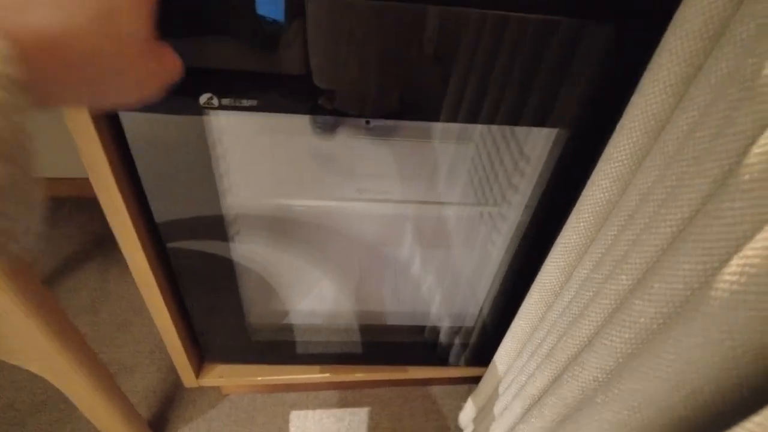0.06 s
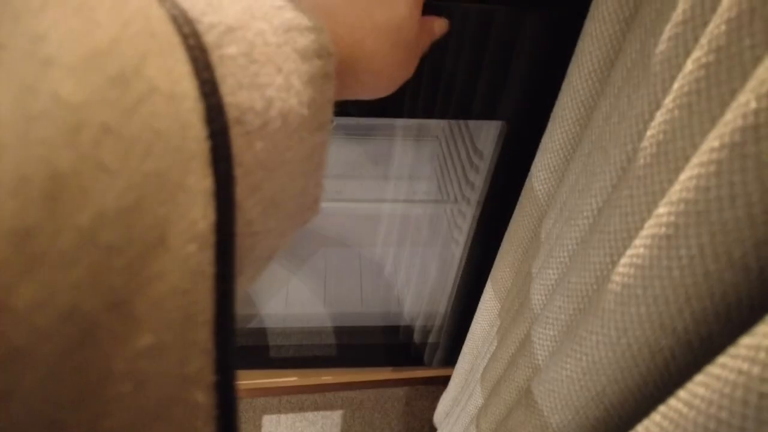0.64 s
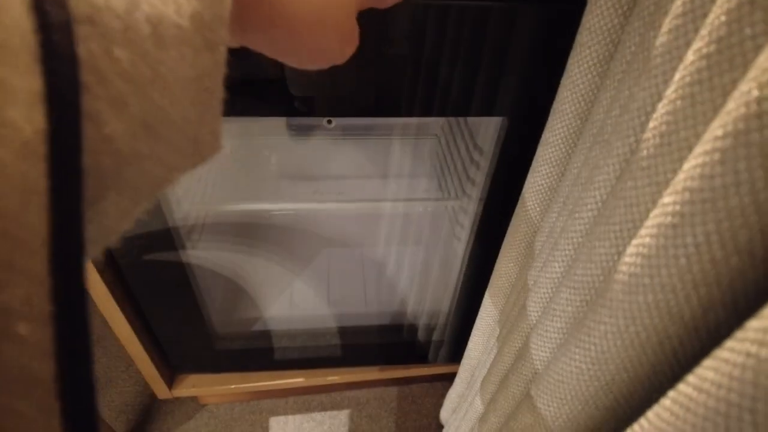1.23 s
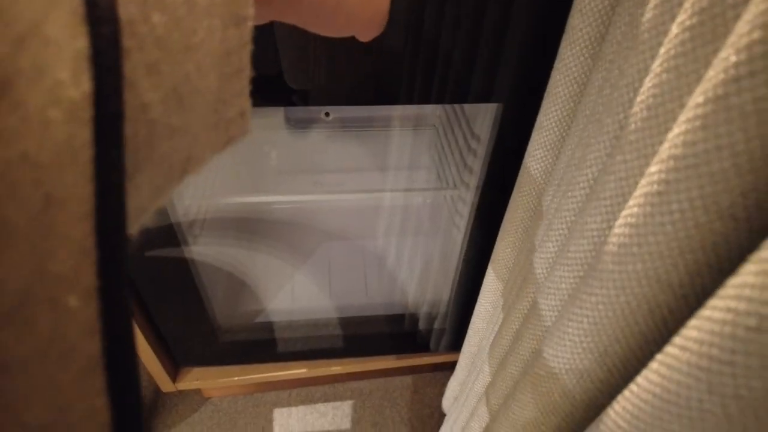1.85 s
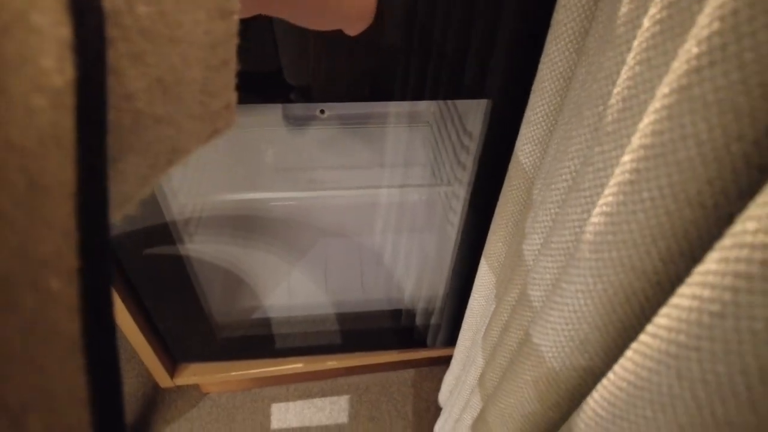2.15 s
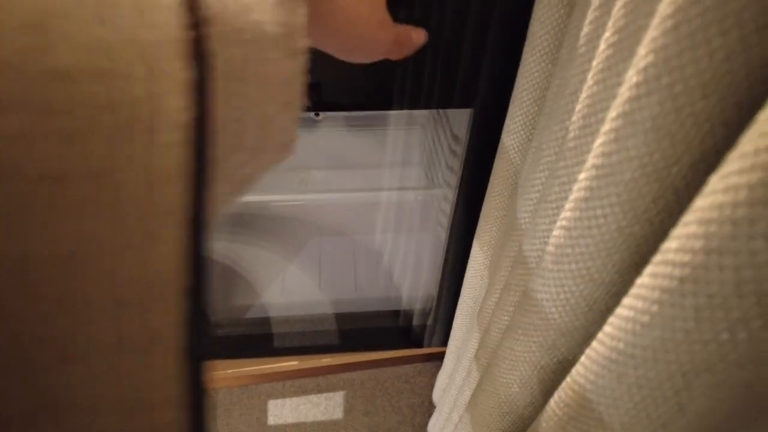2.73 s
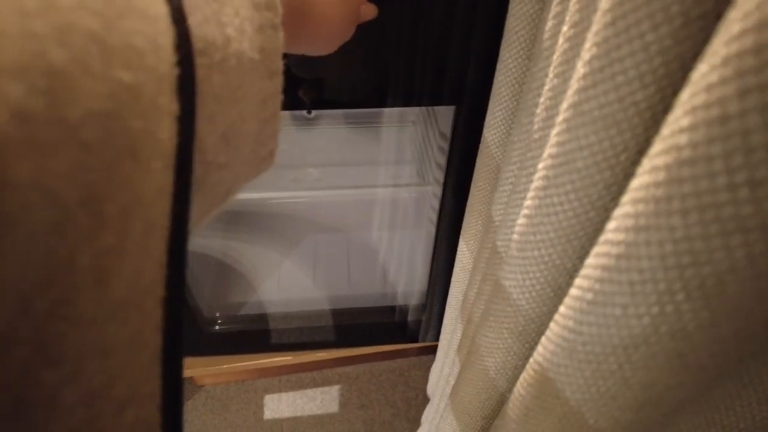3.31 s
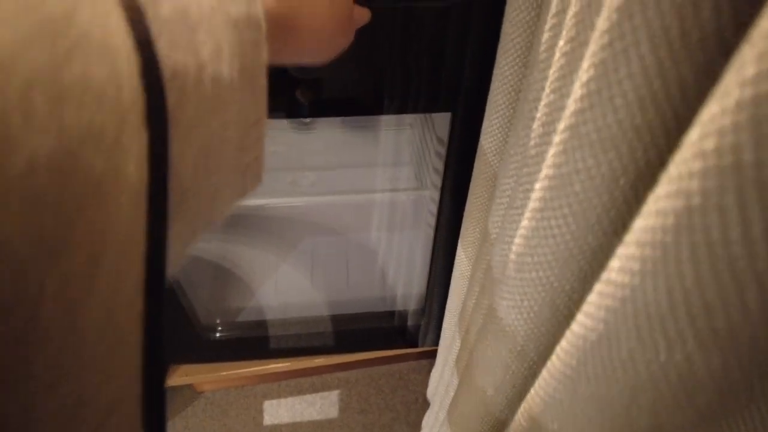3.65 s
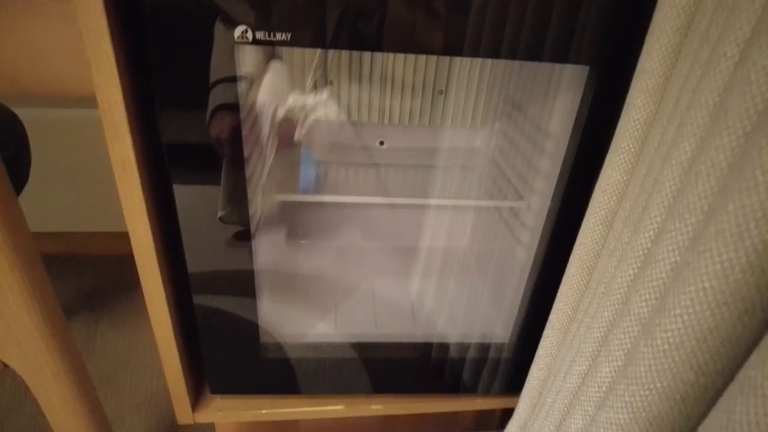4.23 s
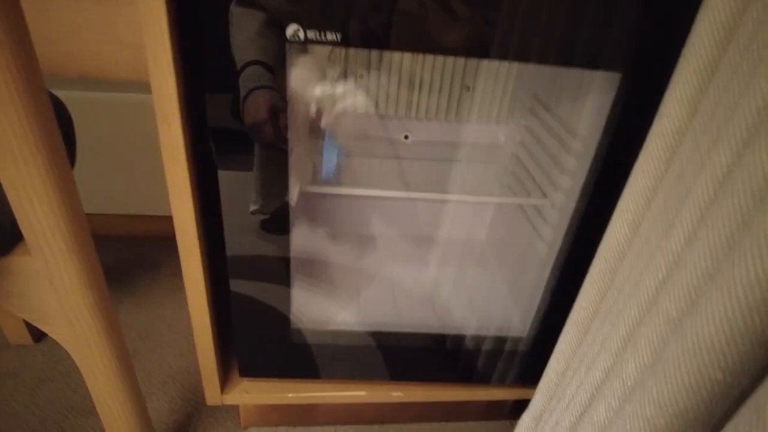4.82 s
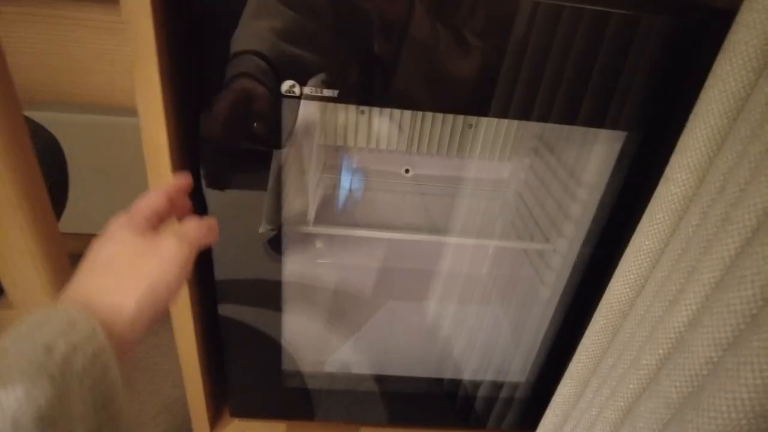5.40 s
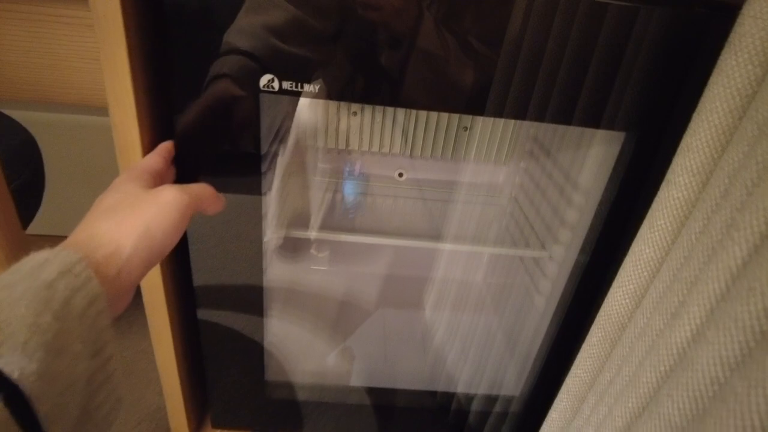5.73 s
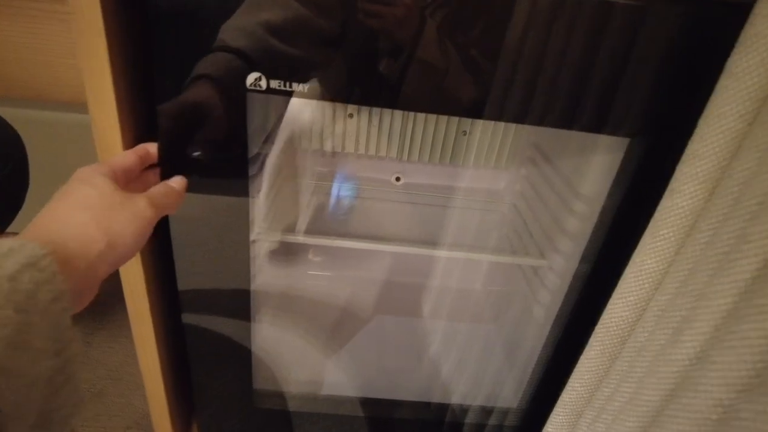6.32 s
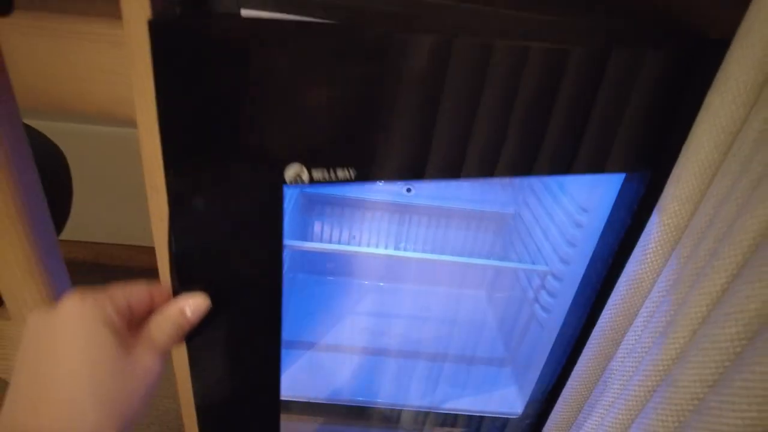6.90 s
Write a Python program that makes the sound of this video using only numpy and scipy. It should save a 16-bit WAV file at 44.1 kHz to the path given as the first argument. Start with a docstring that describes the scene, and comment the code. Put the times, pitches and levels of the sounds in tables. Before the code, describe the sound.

Fingers click and knock on a small fridge's glass door, then its rubber seal peels open, over a deep hum.

```python
"""A hand works the glass door of a small fridge, an arm's length away in a quiet carpeted room.
Fingers try the wrong edge: the plastic frame clicks, a sleeve brushes it and the cabinet thumps.
Then the hand taps the other edge, the rubber seal crackles loose and the door opens with a soft bump.
Each touch is a short push that makes the door or cabinet ring. Behind it all are the fridge's deep
electrical hum, a low rumble of ventilation, a faint hiss and tiny high pips."""
import sys
import numpy as np
from scipy import signal
from scipy.fft import rfft, irfft
from scipy.io import wavfile
from scipy.ndimage import uniform_filter1d

SR = 44100
rng = np.random.default_rng(int(sys.argv[2]) if len(sys.argv) > 2 else 0)


def store_wav(level_fs):
    """Save 16-bit WAV to argv[1]."""
    pcm = np.round(np.clip(np.atleast_2d(level_fs), -1, 1) * 32767)
    wavfile.write(sys.argv[1], SR, pcm.T.astype(np.int16))


N = 306936

# Levels are starting values that the functions shape further. A ring time (t60) is the time to fade
# by 60 dB. "Mid" is the sound both ears share; "side" is what differs between them.

# Clicks of fingers, frame and seal. A hard touch adds treble, a heavy one bass; two notes ring on.
# (time [s], level [dB], treble [dB/octave], bass [dB/octave],
#  first note [Hz], its level [dB], second note [Hz], its level [dB])
DOOR_CLICKS = [(1.5695, -62.5, -7, 0.5, 987, -66, 1920, -70),
               (1.6806, -52.5, 3.5, -0.5, 1016, -58, 3320, -76),
               (1.8193, -39, 2, -1, 582, -42, 1387, -36.5), (1.8239, -48.5, -1, -1.5, 1636, -40, 3210, -48),
               (1.844, -46, -3, -17, 610, -70, 6400, -63), (1.8974, -51, -2, -2, 886, -61, 1960, -58),
               (1.908, -49.5, -4, 2.5, 587, -72, 1040, -58),
               (2.0062, -33, -0.5, -0.5, 1500, -42.5, 4750, -38),
               (2.014, -49, -9, 1.5, 980, -42.5, 1890, -42),
               (2.042, -36.5, -9.5, -0.5, 1080, -38.5, 2880, -43),
               (2.156, -48.5, -1, -0.5, 510, -51.5, 1770, -53),
               (2.1893, -50, -0.5, -14, 380, -65, 2060, -59), (2.2282, -54, -1, 3, 950, -52, 360, -49),
               (2.2406, -53, -3, 0.5, 944, -54, 6200, -67), (2.338, -66, -10, 6.5, 598, -57, 844, -56),
               (2.678, -61, -4, 0.5, 660, -62, 4350, -64), (2.766, -62.5, 4, 2.5, 670, -53, 6080, -62),
               (2.98, -51.5, -4, -0.5, 900, -67, 1898, -53), (3.0877, -46, -5.5, 6, 586, -38, 1594, -53.5),
               (3.092, -58, 2, -12, 1225, -48, 4400, -63.5), (3.159, -61, -8, 0, 1930, -59, 6100, -66.5),
               (3.8241, -67.5, 5, 6.5, 614, -68, 5974, -63),
               (6.0365, -59.5, 5.5, -2.5, 2620, -64, 6200, -62),
               (6.1121, -45, 2.5, -1, 1014, -47.5, 1940, -46), (6.1164, -53, -2, 2, 856, -47.5, 2330, -53),
               (6.1476, -53, 4.5, -19, 801, -57, 5900, -49), (6.2389, -51, -5.5, 3, 461, -52, 2130, -61),
               (6.323, -62.5, 5, 2.5, 774, -70, 3000, -72), (6.364, -67, -6, -7, 1650, -59, 2520, -69),
               (6.3843, -58.5, 8.5, 2.5, 940, -51, 6370, -53), (6.4074, -44, 4, 4, 738, -51, 2800, -60),
               (6.413, -45, -7, -2.5, 1570, -49, 5640, -50), (6.4746, -50.5, 5, 1.5, 704, -56, 4160, -50),
               (6.528, -54.5, 3, -3.5, 1610, -53, 4230, -57), (6.605, -59.5, 2.5, -8, 473, -73, 1580, -70)]
# The door's five pitch ranges: frame, body, pane, edge and tick.
# (low end [Hz], high end [Hz], ring time [s], gain [dB], side level [dB], room ring time [s])
DOOR_RANGES = [(1034, 2310, 0.044, -8, -21, 0.37), (224.5, 582, 0.076, 0, -12.5, 0.84),
               (544, 1100, 0.14, -7.5, 1, 0.42), (2200, 5900, 0.053, -13, -2.5, 0.25),
               (5770, 19000, 0.044, -24, -8, 0.43)]
# Pitches at which the door likes to ring: (pitch [Hz], width [Hz], gain [dB])
DOOR_RESONANCES = [(250.7, 29, 23), (296, 38, 18.5), (402, 56, 12.5), (445, 26, 4.5), (602, 10, 13.5),
                   (730, 76, 10), (867, 40, 12), (983, 50, 9.5), (1225, 26, 11.5), (1322, 160, 12),
                   (1475, 81, 8), (1670, 74, 5), (1786, 240, 3), (2370, 47, 5), (2710, 260, 5.5),
                   (2970, 28, 10), (3250, 240, 3.5), (4030, 420, -2.5), (4580, 62, -2), (5150, 20, -18),
                   (7650, 83, 3)]
# Blows that shake the cabinet:
# (time [s], level [dB], contact time [s], pitch below which the cabinet hardly moves [Hz])
CABINET_BLOWS = [(0.201, -30.5, 0.024, 29.4), (1.82, -24, 0.0034, 330), (1.909, -33.5, 0.0032, 250),
                 (2.006, -34.5, 0.0031, 170), (2.04, -38.5, 0.0041, 90), (3.0854, -21, 0.0045, 79.6),
                 (3.117, -26.5, 0.0073, 60.4), (3.211, -40.5, 0.0062, 81), (4.289, -25, 0.023, 108),
                 (4.37, -29.5, 0.02, 110), (6.113, -35, 0.00099, 334), (6.4087, -26.5, 0.0025, 230),
                 (6.416, -29.5, 0.013, 60)]
# The cabinet's own notes: (pitch [Hz], level [dB], ring time [s])
CABINET_NOTES = [(44.6, 2.5, 1), (86.1, 5, 0.26), (118.1, -3, 0.45), (167.7, -8, 0.41), (191, -5, 0.14),
                 (255.7, 0.5, 0.12), (282.4, 2.5, 0.11), (324, -2, 0.045), (396.5, -14, 0.2),
                 (446.4, -14.5, 0.22)]
# Hollow tones of the gap as the door opens: (pitch [Hz], width [Hz], level [dB])
GAP_RESONANCES = [(335, 55, -58), (450, 40, -55.5), (536, 90, -63), (725, 72, -63), (883, 110, -63),
                  (1300, 440, -69)]
# The flat hand lands on the door's edge, then the fingers settle: (time [s], level [dB])
HAND_PATS = [(5.5162, -44), (5.523, -47), (5.547, -54), (5.5815, -56.5)]
# Pitches at which that edge rings: (pitch [Hz], width [Hz], gain [dB])
EDGE_RESONANCES = [(467, 40, 23.5), (814, 130, 11.5), (1230, 89, 13), (1530, 200, 10), (1790, 160, -1)]
# Dry ticks of a fingernail, a cuff or the seal:
# (time [s], level [dB], low end [Hz], high end [Hz], ring time [s])
SHARP_TICKS = [(1.8435, -69, 4500, 8000, .008), (2.0072, -55, 11500, 14800, .03),
               (2.0402, -58, 11000, 14500, .04), (2.23, -63, 3500, 10000, .008),
               (2.2403, -64, 5000, 8450, .008), (2.679, -65, 3500, 6500, 0.027),
               (3.78, -68, 1800, 6500, .012), (3.8123, -60.5, 1700, 4200, 0.012),
               (3.8238, -65, 3000, 8000, 0.011), (4.2255, -58.5, 550, 3260, 0.00064),
               (6.147, -59, 5500, 10500, .012), (6.4666, -59, 5000, 8000, .012),
               (6.4743, -54.5, 4000, 10000, 0.0061)]
# Sleeve and fingers slide on the door:
# (time [s], rise [s], fade [s], level [dB], treble [dB/octave], bass [dB/octave])
DOOR_RUBS = [(2.15, 0.009, 0.23, -59, -2.5, 1.5), (2.44, 0.071, 0.11, -74, -8, 2.5),
             (2.7, 0.071, 0.017, -80, 8.5, 10.5), (3.029, 0.076, 0.025, -58.5, -1.5, 2.5),
             (6.057, 0.049, 0.046, -60.5, 3, 3), (6.23, 0.045, 0.67, -64.5, -1.5, 2.5)]
# The sleeve drags over the cabinet as the arm comes and goes:
# (time [s], rise [s], hold [s], fade [s], level [dB], treble [dB/octave])
SLEEVE_BRUSHES = [(0.323, 0.0078, 0.038, 0.029, -60.5, 2.5), (0.397, .035, 0.029, 0.037, -70, -10),
                  (3.938, 0.017, 0.043, 0.041, -63.5, 2)]
# Pitches that stand out in that drag: (pitch [Hz], width [Hz], gain [dB])
FABRIC_RESONANCES = [(250.5, 52, 7.5), (476, 98, 4), (702, 107, -2), (1240, 300, -11), (2740, 2200, -21),
                     (5000, 4700, -17.5), (11100, 17000, -22)]
# The hum as the listener moves through loud and quiet spots of the room: (time [s], level [dB])
HUM_LEVELS = [(0, -43), (.2, -41.5), (.45, -48), (.75, -67), (1.05, -57), (1.5, -50.5), (2, -40),
              (2.4, -37), (2.85, -48.5), (3.35, -45.5), (3.65, -41), (4, -41.5), (4.15, -49), (4.3, -39),
              (4.55, -54), (5.75, -51), (6.05, -41.5), (6.45, -39.5), (6.75, -45.5), (6.96, -40)]
# Low rumble of the room and the moving hand: (time [s], level [dB])
RUMBLE_LEVELS = [(0, -46.5), (.45, -46.5), (.9, -48), (2.1, -46), (3.7, -45.5), (4.35, -46.5), (5, -47.5),
                 (6.2, -46), (6.96, -48.5)]
# Tone colour of the rumble: (pitch [Hz], relative level [dB])
RUMBLE_COLOUR = [(20, -4), (30, -1), (40, 1), (55, -2.5), (80, 4), (105, -6.5), (135, -4.5), (190, -9.5),
                 (250, -13), (310, -25.5), (450, -33), (800, -69)]
# Tone colour of the hiss: (pitch [Hz], relative level [dB])
HISS_COLOUR = [(200, 13.5), (500, 18), (750, 15), (1000, 10), (1400, 13), (2200, 4.5), (3000, 5.5),
               (3700, 1.5), (4500, 2), (7000, -3), (8800, -4.5), (9600, -5), (12400, -6.5), (13200, -39)]
# Brief dips in the middle range of the hiss: (time [s], hold [s])
HISS_DIPS = [(0.731, 0.243), (5.202, 0.069)]
# How much the room noise differs between the ears: (pitch [Hz], side minus mid [dB])
STEREO_WIDTH = [(25, -34), (60, -22.5), (250, -13.5), (500, -0.5), (1200, 1), (3000, -1), (8000, 0.5)]

PIVOT_HZ = 1600  # treble and bass are counted in octaves from here
TIME = np.arange(N) / SR


def door_clicks(snap=6.5, build_s=0.0022, room_db=-20.5, blow_s=0.0071, firm_db=-36, doubling_db=54):
    """A click is a snap, a rattle of echoes building up in the wooden recess, and a short room tail."""
    out, t = np.zeros((2, N)), TIME[:SR // 3]
    for at, db, treble_db, bass_db, *_ in DOOR_CLICKS:
        stretch = 2 ** ((db - firm_db) / doubling_db)  # a firmer click shakes more door and rings longer
        for low_hz, high_hz, t60, gain_db, side_db, room_t60 in DOOR_RANGES:
            build_up = 1 - np.exp(-t / (build_s * stretch))
            rattle = stereo_noise(len(t), side_db) * build_up * fade(t, t60 * stretch)
            rattle[:, 0] = snap
            # each pitch range has a room tail of its own length
            tail = stereo_noise(len(t), side_db / 2) * undb(room_db) * fade(t, room_t60)
            click = door_ring(rattle + min(stretch, 1) * tail, low_hz, high_hz)
            level_db = db + gain_db + touch_db(low_hz, high_hz, treble_db, bass_db)
            add(out, as_blow(click, blow_s) * undb(level_db), at)
    return out


def door_ring(force, low_hz, high_hz):
    """The door answers a push by ringing; this gives one pitch range of that answer."""
    nearby = [row for row in DOOR_RESONANCES if low_hz / 2 < row[0] < high_hz * 2]
    return band(resonate(force, nearby), low_hz, high_hz, order=3)


def touch_db(low_hz, high_hz, treble_db, bass_db):
    """How many dB a hard or heavy touch adds to one pitch range of the door."""
    octaves = np.log2(np.sqrt(low_hz * high_hz) / PIVOT_HZ)
    return abs(octaves) * (treble_db if octaves > 0 else bass_db)


def door_notes(pivot_t60=0.046, shortening=0.71, build_s=0.0012, side_db=-10):
    """Each spot on the door has two notes that ring on after a click; higher notes die sooner."""
    out, t = np.zeros((2, N)), TIME[:SR // 4]
    for at, *_, first_hz, first_db, second_hz, second_db in DOOR_CLICKS:
        for hz, db in (first_hz, first_db), (second_hz, second_db):
            mid, side = np.sin(2 * np.pi * (hz * t + rng.random((2, 1))))
            t60 = pivot_t60 * (PIVOT_HZ / hz) ** shortening
            envelope = (1 - np.exp(-t / build_s)) * fade(t, t60)
            add(out, undb(db) * envelope * stereo(mid, undb(side_db) * side), at)
    return out


def cabinet_thumps(spread_s=0.0023):
    """A blow rings the cabinet: a slow push leaves its deep notes, a light knock its higher ones."""
    out, t = np.zeros(N), TIME[:SR]
    for at, db, contact_s, low_hz in CABINET_BLOWS:
        lags = spread_s * rng.random(len(CABINET_NOTES))  # each wall's sound takes its own path
        ring = np.zeros(len(t))
        for k, ((hz, note_db, t60), lag) in enumerate(zip(CABINET_NOTES, lags)):
            gain = undb(note_db) * hz ** 2 / (hz ** 2 + low_hz ** 2)
            wave = np.sin(2 * np.pi * hz * np.maximum(t - lag, 0))
            ring += (-1) ** k * gain * fade(t, t60) * wave  # neighbouring notes swing opposite ways
        push = t * np.exp(-2 * np.pi * t / contact_s)
        thump = signal.fftconvolve(ring, push / push.sum())[:len(t)]
        add(out, undb(db) * thump, at)
    return out


def seal_peel(snaps_per_s=6500, scatter_db=2.5, side_db=-5, rasp_db=-63.5):
    """The rubber seal peels off the cabinet: tiny snaps merge into a rasp and ring the opening gap."""
    lets_go = rng.random((2, N)) < snaps_per_s / SR
    snaps = lets_go * rng.standard_normal((2, N)) * undb(scatter_db * wobble(500))
    force = stereo(snaps[0], undb(side_db) * snaps[1])
    rasp = unit(door_ring(force, low_hz=796, high_hz=7200)) * undb(rasp_db)
    hollow = sum(undb(db) * unit(band(force, hz - width_hz / 2, hz + width_hz / 2, order=2))
                 for hz, width_hz, db in GAP_RESONANCES)
    return (rasp + hollow) * stroke(at=6.405, rise_s=0.022, hold_s=0.084, fade_s=0.026)


def hand_pats(push=7.8, t60=0.046, side_db=-7, room_db=-19, room_t60=0.47, blow_s=0.0056):
    """Soft skin takes the treble out of a tap on the door's edge; a gentle room tail follows."""
    out, t = np.zeros((2, N)), TIME[:SR // 3]
    envelope = fade(t, t60) + undb(room_db) * fade(t, room_t60)
    for at, db in HAND_PATS:
        force = stereo_noise(len(t), side_db) * envelope
        force[:, 0] = push
        tap = band(resonate(force, EDGE_RESONANCES), low_hz=290, high_hz=2280, order=3)
        add(out, as_blow(tap, blow_s) * undb(db), at)
    return out


def sharp_ticks(snap=11.0, side_db=-4, blow_s=0.0014):
    """A dry snap with a very short rattle, heard alone or as the bright edge of a door click."""
    out, t = np.zeros((2, N)), TIME[:SR // 20]
    for at, db, low_hz, high_hz, t60 in SHARP_TICKS:
        force = stereo_noise(len(t), side_db) * fade(t, t60)
        force[:, 0] = snap
        tick = band(force, low_hz, high_hz, order=1)
        add(out, as_blow(tick, blow_s) * undb(db), at)
    return out


def finger_squeak(at=2.758, hz=249.7, db=-38, rise_s=0.011, t60=0.19, overtone_db=-9.5, jitter=0.044):
    """A fingertip sticks and slips on the frame fast enough to make a low note; overtones die first."""
    out, t = np.zeros(N), TIME[:SR // 4]
    cycles = np.cumsum(hz * (1 + jitter * wobble(184)[:len(t)])) / SR
    grip = np.minimum(t / rise_s, 1) * fade(np.maximum(t - rise_s, 0), t60)
    slips = sum(undb(overtone_db * (k - 1)) * grip ** k * np.sin(2 * np.pi * k * cycles)
                for k in (1, 2, 3))
    add(out, undb(db) * slips, at)
    return out


def door_rubs(grain_db=5.0, uneven_db=3.0):
    """Cloth and skin catch and slip, giving the door many uneven little pushes."""
    out = np.zeros((2, N))
    strokes = np.array([stroke(at, rise_s, 0, fade_s) for at, rise_s, fade_s, *_ in DOOR_RUBS])
    *_, level_db, treble_db, bass_db = np.transpose(DOOR_RUBS)
    for low_hz, high_hz, _, gain_db, side_db, _ in DOOR_RANGES:
        gains = undb(level_db + gain_db + touch_db(low_hz, high_hz, treble_db, bass_db))
        pressure = gains @ strokes  # add up the strokes, each at its own strength
        slips = stereo_noise(N, side_db) * undb(grain_db * wobble(900) + uneven_db * wobble(49))
        out += pressure * unit(door_ring(slips, low_hz, high_hz))
    return out


def sleeve_brushes(grain_db=2.0, side_db=-8):
    """The sleeve drags over the cabinet's edge: a hollow sound with a thin scrape on top."""
    out = np.zeros((2, N))
    strokes = np.array([stroke(*row[:4]) for row in SLEEVE_BRUSHES])
    *_, level_db, treble_db = np.transpose(SLEEVE_BRUSHES)
    fibres = stereo_noise(N, side_db) * undb(grain_db * wobble(400))
    for hz, width_hz, db in FABRIC_RESONANCES:
        treble_octaves = max(np.log2(2 * hz / PIVOT_HZ), 0)  # counted from half the pivot pitch
        pressure = undb(level_db + db + treble_db * treble_octaves) @ strokes
        scrape = peak(peak(fibres, hz, width_hz), hz, width_hz)  # twice, for a sharper peak
        out += pressure * unit(scrape)
    return out


def sleeve_swish(db=-76.5, low_hz=1150, uneven_db=3.0):
    """Fleece slides over itself as the arm reaches across: an airy swish that swells and fades."""
    cut_bass = signal.butter(1, low_hz, "high", fs=SR, output="sos")
    fibres = unit(signal.sosfilt(cut_bass, rng.standard_normal((2, N))))
    return fibres * swell(at=4.52, hold_s=0.43, edge_s=0.51) * undb(db + uneven_db * wobble(12))


def fridge_hum(hz=49.06, gain_db=-1, wander=0.0048, left_db=-2.0):
    """A deep electrical note swells and sinks as the listener moves through the room's standing waves."""
    cycles = np.cumsum(hz * (1 + wander * wobble(3.1))) / SR
    tone = np.sqrt(2) * undb(curve(HUM_LEVELS) + gain_db) * np.sin(2 * np.pi * cycles)
    return np.array([undb(left_db) * tone, tone])


def room_air(points, db):
    """Room noise of a given colour, alike at both ears in the bass and unrelated in the treble."""
    mid, side = rng.standard_normal((2, N))
    noise = stereo(mid, colour(side, STEREO_WIDTH))
    return unit(colour(noise, points)) * undb(db)


def hiss(db=-70.5, dip_db=-7.5, middle_hz=(724, 4270)):
    """A faint steady hiss whose middle range dips briefly."""
    steady = room_air(HISS_COLOUR, db)
    middle = signal.sosfiltfilt(signal.butter(2, middle_hz, "band", fs=SR, output="sos"), steady)
    dips = sum(swell(at, hold_s, edge_s=0.018) for at, hold_s in HISS_DIPS)
    return steady + middle * (undb(dip_db * dips) - 1)


def pips(hz=12000, length_s=0.029, db=-81.5, gap_s=(0.16, 0.7)):
    """Thin, high, very quiet pips come at uneven moments."""
    out, t = np.zeros(N), TIME[:int(length_s * SR)]
    pip = undb(db) * np.sin(np.pi * t / length_s) * np.sin(2 * np.pi * hz * t)
    for at in np.cumsum(rng.uniform(*gap_s, size=40)):
        if at < TIME[-1]:
            add(out, pip, at)
    return out


def undb(db):
    """Turn decibels into a number to multiply by."""
    return 10 ** (np.asarray(db) / 20)


def unit(x):
    """Scale a sound to an average strength (rms) of 1."""
    return x / np.sqrt(np.mean(x ** 2))


def as_blow(x, blow_s):
    """Scale a sound so that its energy, packed into blow_s seconds, would have strength 1."""
    return unit(x) * np.sqrt(blow_s * SR / x.shape[-1])


def fade(t, t60):
    """Die away, 60 dB down after t60 seconds."""
    return np.exp(-np.log(1000) * t / t60)


def stroke(at, rise_s, hold_s, fade_s):
    """Rise from 0 to 1, hold, and die away."""
    rise = np.clip((TIME - at) / rise_s, 0, 1)
    return rise * np.exp(-np.maximum(TIME - at - rise_s - hold_s, 0) / fade_s)


def swell(at, hold_s, edge_s):
    """Rise from 0 to 1, hold, and sink back just as fast."""
    return np.interp(TIME, at + np.cumsum([0, edge_s, hold_s, edge_s]), [0, 1, 1, 0])


def curve(points):
    """Join (time, value) points with straight lines."""
    return np.interp(TIME, *np.transpose(points))


def wobble(per_s):
    """Glide between random values of size near 1, per_s times a second."""
    hold = int(SR / per_s)
    steps = np.repeat(rng.standard_normal(N // hold + 1), hold)
    return uniform_filter1d(steps, hold)[:N]


def colour(x, points):
    """Shape a steady sound by (pitch, level) points."""
    hz, db = np.transpose(points)
    pitches = np.maximum(np.fft.rfftfreq(N, 1 / SR), 1)
    gains = undb(np.interp(np.log(pitches), np.log(hz), db))
    return irfft(rfft(x) * gains, N)


def peak(x, hz, width_hz):
    """Keep the sound near one pitch."""
    return signal.lfilter(*signal.iirpeak(hz, hz / width_hz, fs=SR), x)


def resonate(force, resonances):
    """A push plus the ringing it stirs up in an object."""
    return force + sum(undb(db) * peak(force, hz, width_hz) for hz, width_hz, db in resonances)


def band(x, low_hz, high_hz, order):
    """Keep one range of pitch."""
    return signal.sosfilt(signal.butter(order, [low_hz, high_hz], "band", fs=SR, output="sos"), x)


def stereo(mid, side):
    """Make left and right from mid and side."""
    return np.array([mid + side, mid - side])


def stereo_noise(samples, side_db):
    """Noise for two ears; a higher side_db sounds wider."""
    mid, side = rng.standard_normal((2, samples))
    return stereo(mid, undb(side_db) * side)


def from_left(x, left_db):
    """The hand works on the left: that ear hears it a little louder and one sample sooner."""
    return np.array([x[0] * undb(left_db), np.roll(x[1], 1)])


def add(out, sound, at):
    """Mix a sound in from a given time on."""
    start = int(at * SR)
    out[..., start:start + sound.shape[-1]] += sound[..., :N - start]


def scene():
    """The handling of the door over hum, ventilation rumble, hiss and pips."""
    handling = door_clicks() + door_notes() + sharp_ticks() + hand_pats()
    handling += door_rubs() + sleeve_brushes() + seal_peel()
    background = fridge_hum() + room_air(RUMBLE_COLOUR, curve(RUMBLE_LEVELS)) + hiss() + pips()
    foreground = from_left(handling, left_db=0.6) + sleeve_swish() + cabinet_thumps() + finger_squeak()
    return foreground + background


def record(dry):
    """Cut the very highest treble, above 15800 Hz."""
    return signal.sosfilt(signal.ellip(8, .2, 70, 15800, fs=SR, output="sos"), dry)


dry = scene()
out = record(dry)
store_wav(out)
```